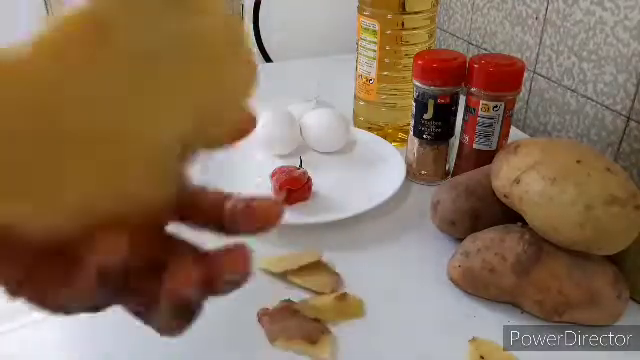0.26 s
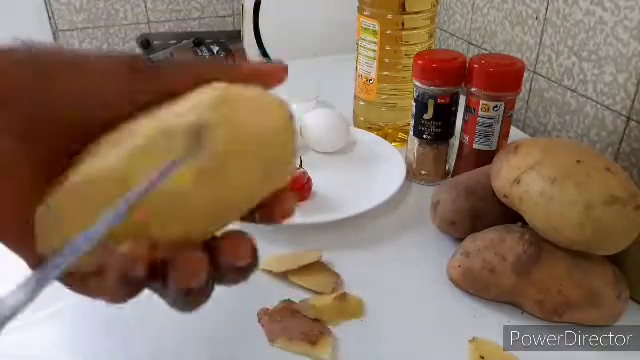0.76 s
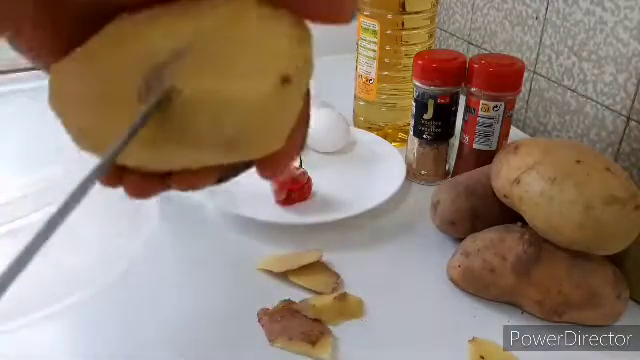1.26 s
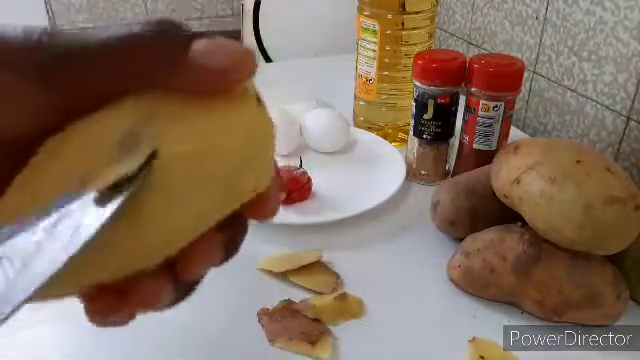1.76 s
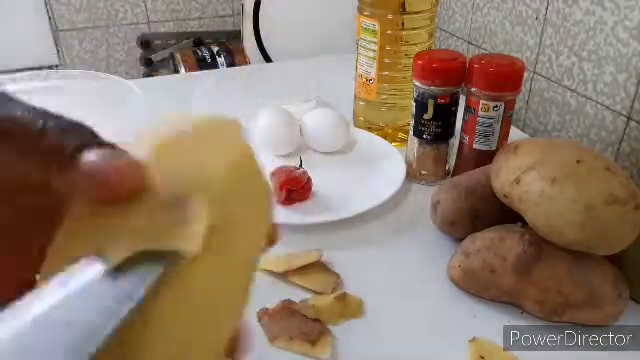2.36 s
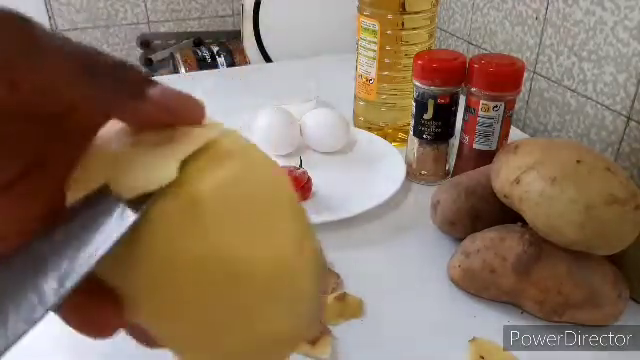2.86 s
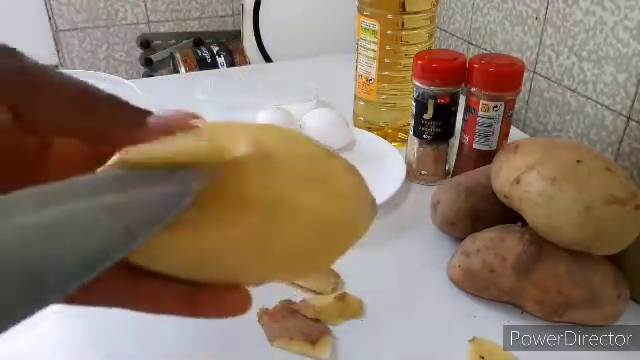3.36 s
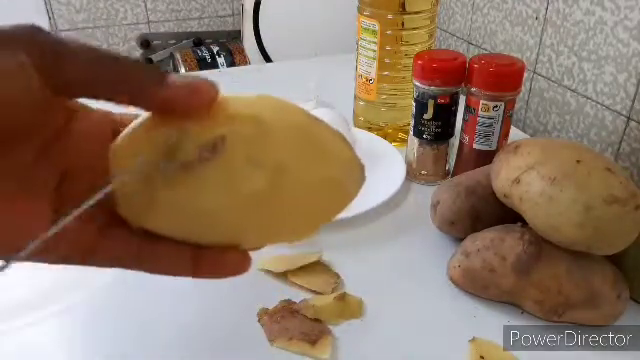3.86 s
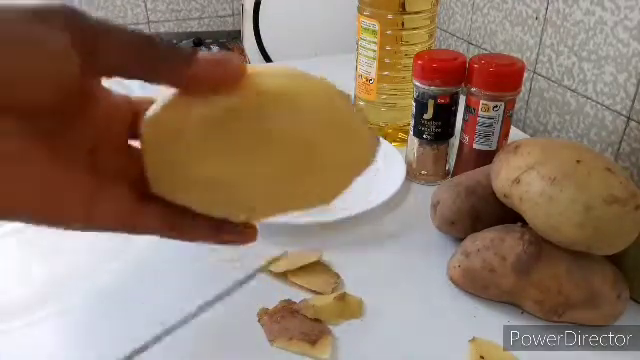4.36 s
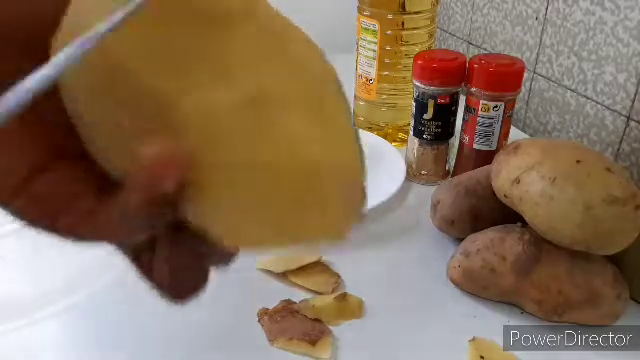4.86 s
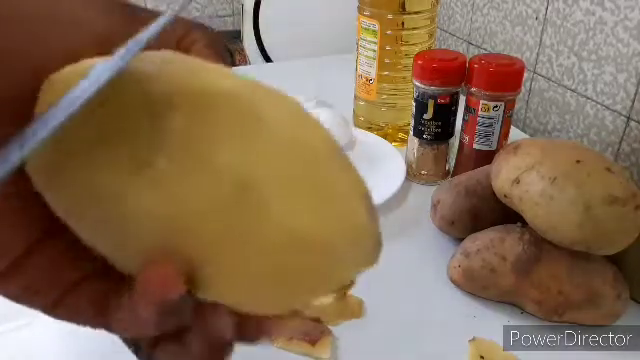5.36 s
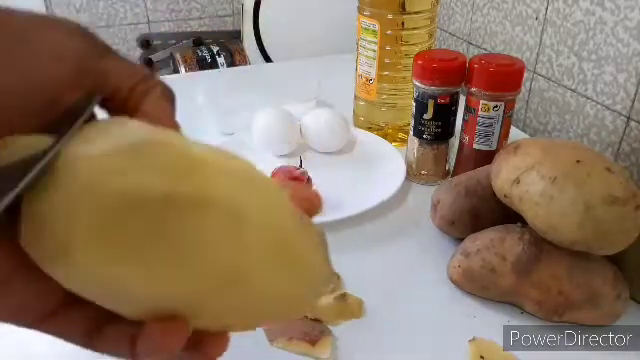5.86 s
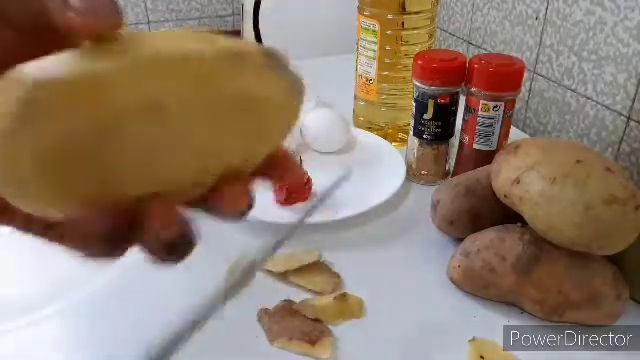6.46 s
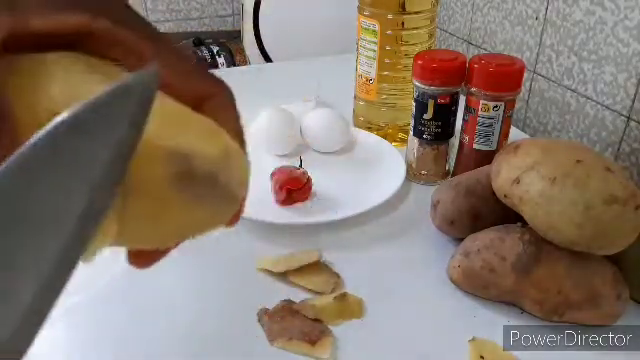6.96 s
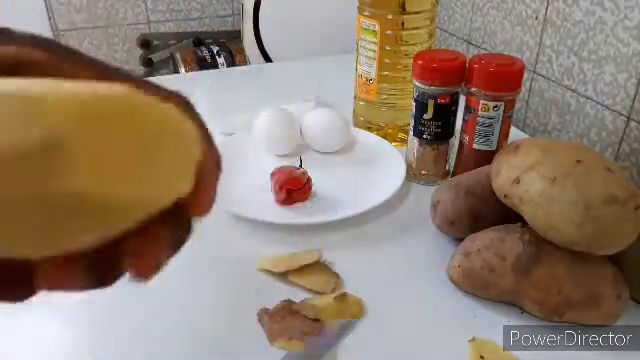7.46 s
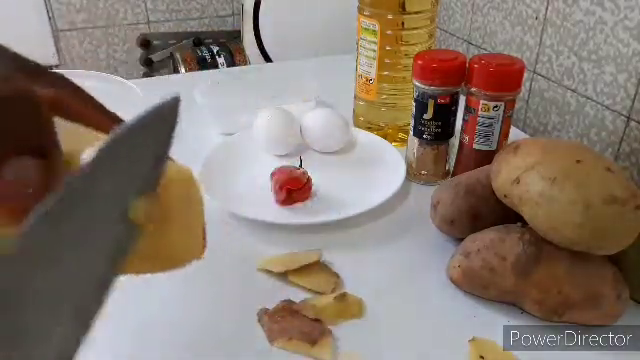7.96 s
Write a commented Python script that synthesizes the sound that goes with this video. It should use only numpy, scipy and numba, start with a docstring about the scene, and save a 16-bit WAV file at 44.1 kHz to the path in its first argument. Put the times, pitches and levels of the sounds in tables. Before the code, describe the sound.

Close, crisp potato peeling: fizzy wet cuts and tiny cracks, dull knocks on a hollow counter, quiet low hum in a small tiled kitchen.

```python
"""A small tiled kitchen: a knife slices through a raw potato held near a stereo phone.
Wet cells tear in a fizz of filtered noise bursts, with sharp snaps and brief squeaks of shaped noise.
Cut pieces drop on a hollow counter top that booms as a bank of decaying modes, and shiver on in a dull clatter.
A fridge hums as a few wavering sine lines, over resonant low noise and a smooth room hiss."""
import sys
import numpy as np
from scipy import signal
from scipy.fft import rfft, irfft
from scipy.io import wavfile
from scipy.ndimage import uniform_filter1d
from numba import njit

SR = 44100
rng = np.random.default_rng(int(sys.argv[2]) if len(sys.argv) > 2 else 0)


def wrap_up_sound(samples):
    """Save the sound to the file named by the first command line argument, as 16-bit audio."""
    columns = np.atleast_2d(samples).T
    # keep every value between -1 and 1, then stretch to whole-number steps
    tamed = np.clip(columns, -1, 1)
    steps = np.round(tamed * 32767).astype(np.int16)
    wavfile.write(sys.argv[1], SR, steps)


N = 362943

# resonances, each: f/Hz, width/Hz, relative level/dB
# bright fizz of tearing cells
FIZZ_BANDS = [(12900, 4900, -4)]
# sizzle below the fizz: f/Hz, width/Hz, relative level/dB
SIZZLE_BANDS = [(8820, 3800, -4)]
# crunch of the flesh: f/Hz, width/Hz, relative level/dB
CRUNCH_BANDS = [(3937, 1260, 6), (6160, 2040, -0.5)]
# broad ring of the blade: f/Hz, width/Hz, relative level/dB
BLADE_BANDS = [(2520, 990, 0)]
# dull drag of the hand: f/Hz, width/Hz, relative level/dB
DRAG_BANDS = [(660, 1225, 10.5), (1364, 900, -5)]
# drops on the counter: t/s, relative level/dB, hardness/dB, left minus right/dB; by landing place: lowest mode/dB,
# long ring near 210 Hz/dB, rings near 300 Hz/dB; clatter after it/dB
DROP_EVENTS = [(.0600, -27, -4, 3, 0.5, -13, -2, -53.5), (0.104, -34.5, 12, 5, 11, -3, -2, -48),
               (0.118, -20.5, 0, 1.5, -1.5, -15, -3.5, -58), (.195, -37.5, 2, -1, 2, -8, -2, -64),
               (4.279, -25.5, -1.5, 3.5, -1, -5.5, -3.5, -56.5), (4.312, -40, 4, 4, 0, 13, -2, -59.5),
               (4.353, -49, -4, 0, 0, -6, 9, -70), (4.377, -44.5, 5, 4, 1, 5, -4, -88),
               (7.412, -20.5, -0.5, 2.5, -1.5, 4.5, -2, -41), (7.423, -38, 9, -2, -9, -14, 4, -51),
               (7.4448, -36, 2, 3, 5, -1, -2, -68), (7.522, -40, 10.5, 3, -1, -3, 2, -59.5),
               (7.584, -30, 2, 4, 3.5, 0, -4, -63.5), (7.6486, -16, 0.5, 2, -4.5, -8.5, -4, -68),
               (7.685, -42, -3, 0, -8, 0, -3, -62), (7.747, -41, -2, 2, 6.5, 5.5, -4, -67)]
HAND_LAG = 18  # samples by which the right port hears the hands late


def undb(db):
    """Amplitude factor of a level in dB."""
    return 10 ** (np.asarray(db) / 20)


def unit(x):
    """Scale to rms 1."""
    return x / np.sqrt(np.mean(x ** 2))


def curves(table):
    """Columns of a table joined by straight lines, one value a sample."""
    s, *columns = np.transpose(table)
    return [np.interp(np.arange(N) / SR, s, c) for c in columns]


def noise():
    """White noise of rms near 1."""
    return rng.standard_normal(N)


def resonate(x, peaks):
    """Sum of steep resonances with alternating sign; rms near 1 for white input of rms 1."""
    out = 0
    for k, (hz, width, db) in enumerate(peaks):
        edges = [hz - width / 2, min(hz + width / 2, SR / 2.2)]
        sos = signal.butter(2, edges, "band", fs=SR, output="sos")
        out = out + (-1) ** k * undb(db) * signal.sosfilt(sos, x)
    power = sum(undb(2 * db) * 2 * width / SR for _, width, db in peaks)
    return out / np.sqrt(power)


def walk(rate):
    """Random levels held 1 / rate s and slewed twice; spread near 1."""
    k = max(int(SR / rate), 1)
    steps = np.repeat(rng.standard_normal(N // k + 1), k)
    return unit(uniform_filter1d(uniform_filter1d(steps, k), k)[:N])


def ports(envelope, alike, lag_count):
    """Shaped noise at two microphone ports: partly alike, the right one late by lag_count samples."""
    left = noise()
    alike = np.clip(alike, 0, 1)
    right = alike * np.roll(left, lag_count) + np.sqrt(1 - alike ** 2) * noise()
    return np.array([envelope * left, np.roll(envelope, lag_count) * right])


def pan(db):
    """Left and right gains that differ by db."""
    return undb(np.array([db, -db]) / 2)


def background():
    """Drifting levels of the upper, middle and low standing waves and of the hum."""
    # kitchen background: t/s, upper standing waves/dB, middle one/dB, low ones/dB, hum/dB
    background_levels = [(0.4, -57, -56, -63.5, -61.5), (0.63, -63.5, -62, -64, -63.5),
                         (0.81, -56, -72, -60, -64), (1.07, -61, -68.5, -66, -63.5),
                         (1.23, -92, -96, -68, -64.5), (1.6, -94, -75, -64, -65.5),
                         (1.85, -67, -70.5, -65.5, -63), (2.6, -68, -73, -65.5, -66.5),
                         (3.05, -67, -66, -64.5, -61), (3.26, -65.5, -68.5, -71, -60),
                         (3.45, -74, -71, -69, -69), (3.7, -59.5, -66.5, -62.5, -61.5),
                         (4.0, -69, -72, -71.5, -66.5), (4.46, -55.5, -68.5, -61.5, -62),
                         (4.9, -95.5, -74, -89.5, -70.5), (5.33, -72.5, -71, -72, -65),
                         (5.65, -66, -67.5, -66.5, -66), (6.27, -60.5, -76.5, -72, -63),
                         (6.42, -72, -83, -79, -70), (6.65, -68.5, -71.5, -82, -68.5),
                         (7.2, -63, -71, -64, -63), (7.9, -71, -64, -61.5, -63.5),
                         (8.14, -57.5, -66, -72, -62.5)]
    return curves(background_levels)


def fridge():
    """Compressor lines waver slightly in phase and level, the right port lagging; a thin noise whine joins."""
    # hum lines: f/Hz, relative level/dB
    hum_lines = [(99.5, -6), (148, 1.5), (199, -15), (345, -19.5), (395.5, -12), (444, -17), (501, -32.5),
                 (643, -15), (692, -37.5)]
    # faint steady whine: f/Hz, width/Hz, relative level/dB
    whine_bands = [(4170, 160, 0), (6780, 200, -3)]
    whine_db = -88
    t, hum = np.arange(N) / SR, 0
    for hz, db in hum_lines:
        phase = 2 * np.pi * (hz * t + rng.random()) + 0.8 * walk(8)
        lag = hz / 250 * np.array([[0], [1]])  # radians, left and right
        hum = hum + np.sqrt(2) * undb(db + 1.48 * walk(6.5)) * np.sin(phase - lag)
    whine = resonate(rng.standard_normal((2, N)), whine_bands)
    whine = undb(whine_db + 2 * walk(6)) * pan(6.0)[:, None] * whine
    hum_db = background()[3]
    return undb(hum_db) * hum * pan(6.0)[:, None] + whine


def rumble():
    """Low noise from far off excites the standing waves of the kitchen."""
    # upper standing waves: f/Hz, width/Hz, relative level/dB
    upper_waves = [(293.2, 13, -4.5), (316.9, 11.2, -3)]
    # middle standing wave: f/Hz, width/Hz, relative level/dB
    middle_wave = [(259, 10.4, 0)]
    # low standing waves: f/Hz, width/Hz, relative level/dB
    low_waves = [(68, 120, 0.5), (105.5, 17, -0.5), (121.6, 12, 4), (212, 57, -4.5)]
    push = ports(np.ones(N), alike=0.92, lag_count=0)
    waves = zip(background(), (upper_waves, middle_wave, low_waves))
    return pan(1.38)[:, None] * sum(undb(db) * resonate(push, peaks) for db, peaks in waves)


def air():
    """The still room: a smooth hiss, more alike at the ports in the bass than higher up."""
    # spectrum of the hiss: f/Hz, relative level per Hz/dB
    air_spectrum = [(20, -19.5), (45, 0.5), (100, -9), (160, -14), (300, 0.5), (460, -10.5), (640, -13),
                    (1000, -35), (1400, -19), (2400, -30), (3300, -37.5), (5900, -42), (9000, -33.5),
                    (15500, -30.5)]
    air_db = -68.5
    hz = np.maximum(np.arange(N // 2 + 1) * SR / N, 1)
    curve_hz, curve_db = np.transpose(air_spectrum)
    gain = undb(np.interp(np.log(hz), np.log(curve_hz), curve_db))
    side = np.clip(hz / 600, .4, 1) * np.array([[1], [-1]])  # part of opposite sign at the two ports
    hiss = irfft(gain * (rfft(noise()) + side * rfft(noise())), N)
    return undb(air_db + 3.6 * walk(5.1)) * pan(0.22)[:, None] * unit(hiss)


def pressure():
    """Each push swells, holds, dies and settles; gives the gains of five parts at two ports, and the crunch pitch."""
    # pushes of the blade and rubs of the fingers: t/s at full pressure, hold/s, fizz level/dB, rise/ms and fall/ms
    # (both for 20 dB); against the fizz: sizzle/dB, crunch/dB, blade ring/dB, drag/dB;
    # left minus right/dB, crunch f/Hz
    push_events = [(0.0, 0.002, -54.5, 10, 41.7, -10, -3.5, -23, -18, 3.3, 5430),
                   (0.103, 0.024, -65.5, 52, 194.6, -3, 7, 8, 11, 1.4, 3770),
                   (0.331, .19, -70, 28, 150.7, 2, 1.5, -18, -5, 8.7, 5140),
                   (0.693, 0.0077, -75, 60, 545, 4.5, 1, -3.5, -5, 4.3, 5000),
                   (1.302, 0.0022, -53, 75, 50.4, -16, -6, -14, -11.5, 3, 3900),
                   (1.42, 0.22, -66, 23, 198.5, 3.5, 1.5, -11, -19, 6.1, 5000),
                   (1.65, 0.046, -55, 170, 99, -0.5, -3, -13.5, -18, 6, 5050),
                   (1.72, 0.0018, -45, 18, 112, -8, -8.5, -15, -36, 8.8, 5100),
                   (1.793, .002, -43, 47, 112, 2.5, -0.5, -9.5, -24.5, 7.4, 4560),
                   (1.85, 0.035, -56.5, 100, 69.8, -6, 2, -6, -8.5, 2.4, 4300),
                   (1.92, 0.26, -64, 46, 60.2, 0.5, 0.5, -11, -9.5, 6.2, 4660),
                   (2.112, 0.002, -50, 13, 138.3, 2.5, 3, -2.5, -14.5, 2, 4340),
                   (2.665, 0.018, -66, 28, 100, -4, -3, -18, -27, 10, 4070),
                   (2.70, 0.14, -58.5, 52, 100, -5, -4, -25, -12.5, 6.9, 4550),
                   (2.93, 0.0018, -49, 150, 272, -5.5, 2, -6.5, -12.5, 6.3, 4820),
                   (3.08, 0.16, -56.5, 100, 100.8, -7, -16, -29, -12.5, 7, 4520),
                   (3.226, 0.0011, -43.5, 105, 61, 1.5, 4, -10.5, -21, 7.7, 5750),
                   (3.457, 0.0016, -56, 82, 54.9, -9, -2, -6.5, -8, 8.1, 4410),
                   (3.581, .002, -71, 40, 110, -7, 6, -2, 9, 5, 5270),
                   (3.87, 0.13, -75, 240, 100, -4, 2.5, -4, -9, 4, 4690),
                   (4.149, 0.057, -53.5, 13, 99.6, -4.5, 1.5, -5, -10, 4.5, 4010),
                   (4.22, 0.031, -59, 100, 111.5, -3, 4.5, -1, -7, 1.9, 3940),
                   (4.51, .002, -78.5, 200, 810, -1, -2, -7, -10, 5.5, 4540),
                   (4.75, 0.29, -85.5, 340, 200, 5, 8, -10.5, -17, 3.3, 4850),
                   (5.11, 0.012, -69.5, 60, 80, -3.5, -6.5, -13, -24, 7.1, 4800),
                   (5.22, 0.0021, -65, 11, 60, -15, -4.5, -15, -5, 4.9, 3970),
                   (5.577, 0.035, -52.5, 33, 60, -19, -7, -16, -17, 6.2, 4380),
                   (5.694, 0.015, -50.5, 49, 40, -12, 1, -12, -14, 6.8, 4790),
                   (5.727, 0.0012, -40.5, 41, 29.3, -3, 3.5, -6.5, -15.5, 3.8, 4700),
                   (5.891, 0.0017, -38, 26.4, 25.1, 0.5, 2, -18.5, -19, 5.3, 4480),
                   (6.53, .002, -82.5, 100, 200, 1.5, -6, -24, -26.5, 14, 5120),
                   (7.10, .002, -50.5, 36.5, 199.5, -3, 0, -13, -10.5, 8.4, 4200),
                   (7.16, 0.05, -57, 60, 100, -12, 0.5, -3.5, -6.5, 8, 3990),
                   (7.25, 0.018, -42, 43, 60, -2.5, 0, -11.5, -14, 9.5, 4500),
                   (7.295, 0.017, -40, 64, 53.1, -0.5, 2, -16, -15, 7.9, 4780),
                   (7.57, 0.07, -69.5, 60, 201, -1, -2, -5, 1, 3.6, 4990),
                   (7.97, 0.1, -58.5, 21, 80.1, -8, -2.5, -11, -14, 8, 4270),
                   (8.015, .008, -49.5, 23, 50.1, -10, -4, -22, -14, 6.5, 4060),
                   (8.063, 0.018, -40.5, 56, 27.85, -4, -3, -25, -21.5, 4.7, 4290)]
    # the hands never rest: fizz level/dB; against it sizzle/dB, crunch/dB, blade ring/dB, drag/dB;
    # left minus right/dB, crunch f/Hz
    holding = (-86, -6.5, 1.5, -2, 3, 1.5, 4694.5)
    settle_db, settle_ms = -41, 710  # the cut settles softly after each push; time for 20 dB
    t = np.arange(0, N / SR + .01, 1 / 1000)  # 1 ms grid
    s, hold, db, rise, fall, *rest = np.transpose(push_events)[:, :, None]
    before = np.maximum(s - t, 0) * 1000
    after = np.maximum(t - s - hold, 0) * 1000
    dying = undb(-20 * after / fall) + undb(settle_db - 20 * after / settle_ms)
    push = undb(db - 20 * before / rise) * dying
    power = np.vstack([push, undb(holding[0]) + 0 * t]) ** 2
    *parts_db, pan_db, hz = (np.append(c, h) for c, h in zip(rest, holding[1:]))

    def fine(v):
        """From the 1 ms grid to one value a sample."""
        return np.interp(np.arange(N) / SR, t, v)

    gains = []
    for part_db in [0 * hz] + parts_db:  # the fizz is the reference
        gains.append([fine(np.sqrt((undb(part_db) * p) ** 2 @ power)) for p in pan(pan_db)])
    crunch_hz = hz @ power / power.sum(axis=0)  # the strongest push dominates
    return np.array(gains), fine(crunch_hz)


def tearing(per_s=2500.0, spread_db=0.5, burst_ms=0.624, bed=1.1):
    """Cells burst at random moments, some louder than the rest, over a wet hiss; the blade sticks and slips."""
    loudness = undb(spread_db * np.minimum(rng.exponential(size=N), 4))
    bursts = (rng.random(N) < per_s / SR) * loudness
    bursts = signal.lfilter([1], [1, -np.exp(-1000 / (burst_ms * SR))], bursts)
    return unit((bed + unit(bursts)) * undb(0.95 * walk(50)))


@njit
def sweep(x, hz, width):
    """State-variable band-pass with a moving centre, gain 1 there."""
    y, band, low = np.empty(len(x)), 0., 0.
    for i in range(len(x)):
        g, k = np.tan(np.pi * hz[i] / SR), width / hz[i]
        v = (band + g * (x[i] - low)) / (1 + g * (g + k))
        band, low, y[i] = 2 * v - band, low + 2 * g * v, k * v
    return y


def slicing():
    """Grainy noise of torn cells rings the tuber, the blade and the hand that drags it, driven by the pushes."""
    # narrow rings of the blade: f/Hz, width/Hz, relative level/dB
    steel_rings = [(2273, 220, -13.5), (4080, 72, 6), (4826, 130, 1.5), (6380, 350, -2.5), (8640, 540, -5),
                   (12500, 600, 5)]
    steel_db = -12
    gains, crunch_hz = pressure()
    grain = tearing()
    tear, slit = (ports(grain, alike=0.059, lag_count=HAND_LAG) for _ in range(2))
    # the opening slit adds a resonance whose pitch moves with the pushes
    opening = unit(np.array([sweep(v, crunch_hz, 600.0) for v in slit]))
    crunch = undb(-4.0) * resonate(tear, CRUNCH_BANDS) + undb(-7.0) * opening
    crunch = crunch + undb(steel_db) * resonate(slit, steel_rings)
    fizz, sizzle = resonate(tear, FIZZ_BANDS), resonate(slit, SIZZLE_BANDS)
    blade, drag = resonate(slit, BLADE_BANDS), resonate(tear, DRAG_BANDS)
    parts = fizz, sizzle, crunch, blade, drag
    return sum(gain * undb(2.07 * walk(35)) * part for gain, part in zip(gains, parts))


def squeaks():
    """Wet skin or blade rubs briefly: flat-topped noise excites a narrow ring and a broad hiss together."""
    # squeaks: t/s, length/ms, f/Hz, width/Hz, ring level/dB, hiss level/dB, left minus right/dB
    squeak_events = [(0.015, 19, 2380, 300, -62.5, -68, 16), (1.259, 51, 3890, 490, -60, -65.5, 16.5),
                     (3.442, 31, 2450, 250, -60.5, -98, 15.5), (4.149, 15, 2360, 300, -48, -45, 4),
                     (4.184, 11.2, 4060, 497, -41.5, -38, 6), (5.692, 12, 13400, 2500, -44, -50.5, 7),
                     (5.888, 11, 4440, 700, -41, -58.5, 4.5), (7.317, 11, 4670, 500, -36, -35, 1.5),
                     (7.524, 12, 1430, 660, -44, -80, 3), (7.534, 24, 1850, 1190, -64, -87, 4)]
    out, size = np.zeros((2, N)), SR // 10
    t = np.arange(size) * 1000 / SR  # ms
    rubs = rng.standard_normal((len(squeak_events), 2, size))
    for (s, ms, hz, width, ring_db, hiss_db, pan_db), rub in zip(squeak_events, rubs):
        rub = rub * np.clip(t / 1.3, 0, 1) * np.clip((ms - t) / 4.3, 0, 1)
        ring = undb(ring_db) * resonate(rub, [(hz, width, 0)])
        hiss = undb(hiss_db) * resonate(rub, FIZZ_BANDS + SIZZLE_BANDS)
        start = int(s * SR)
        out[:, start:start + size] += pan(pan_db)[:, None] * (ring + hiss)
    return out


def drops():
    """Each piece pushes the counter briefly and rings its modes; harder landings reach the high ones."""
    # modes of the hollow counter: f/Hz, relative level/dB, t60/s
    counter_modes = [(122.5, 7, 0.29), (208.3, 4.5, 0.3), (212, 11, 0.04), (266, -3.5, 0.3),
                     (309, -4.5, 0.33), (370.4, 1.5, 0.15), (445, 3, 0.026), (406, -12.5, 0.36),
                     (460.5, -9.5, 0.13), (521, -1, 0.059), (564, -5, 0.062), (660, -32, 0.5),
                     (720, -20, 0.16), (791, -26, 0.09), (950, -14, 0.015), (1186, -21.5, 0.03),
                     (1390, -20, 0.022), (1432, -8, 0.025), (1810, -22, 0.043), (2300, -35, 0.033)]
    # how the modes reach the ports: f/Hz, left minus right/dB, left leads by/rad
    counter_ports = [(122, 0, -0.5), (210, 0.5, -0.26), (310, -6, 0.1), (370, 1, 0.8), (540, -1, -0.1),
                     (1400, 1.5, 0.3)]
    # loose things on the counter: f/Hz, width/Hz, relative level/dB
    rattle_bands = [(650, 300, 21), (1060, 1400, -18), (1840, 410, -23)]
    boom_build_ms = 5.6  # the hollow under the top is slow to start
    size = 3 * SR // 4
    out, t = np.zeros((2, N + SR)), np.arange(size) / SR
    hz, mode_db, t60 = np.transpose(counter_modes)
    port_hz, *columns = np.transpose(counter_ports)
    lean_db, lead = (np.interp(np.log(hz), np.log(port_hz), c) for c in columns)
    build_s = np.append(boom_build_ms / 1000, 0.46 / hz[1:])  # the others build up within a cycle
    shape = np.exp(-np.log(1000) * t / t60[:, None]) * (1 - np.exp(-t / build_s[:, None]))
    turn = 2 * np.pi * hz[:, None] * t + np.array([lead, -lead])[:, :, None] / 2
    # the top dips under the blow while the hollow below puffs out: low and high modes start with opposite sign
    rings = (np.sign(300 - hz) * pan(lean_db))[:, :, None] * shape * np.sin(turn)
    upper = np.clip(np.log2(hz / 300), 0, 2)  # octaves above 300 Hz
    shakes = rng.standard_normal((len(DROP_EVENTS), 2, size))
    for (s, db, hard_db, pan_db, low_db, long_db, mid_db, _), shake in zip(DROP_EVENTS, shakes):
        place_db = np.append([low_db, long_db, 0, mid_db, mid_db], np.zeros(len(hz) - 5))
        ring = undb(mode_db + upper * hard_db + place_db) @ rings
        rattle = undb(hard_db - 14) * resonate(shake * np.exp(-t / 0.014), rattle_bands)
        start = int(s * SR)
        out[:, start:start + size] += undb(db - 12.5) * pan(pan_db)[:, None] * (ring + rattle)
    return out[:, :N]


def clatter():
    """After each drop the wet piece and its neighbours shiver on: dull noise with a little hiss."""
    hiss_db, decay_s = -15.5, 0.041  # hiss against the dull part; time constant
    s, *_, db = np.transpose(DROP_EVENTS)
    hits = np.zeros(N)
    hits[(s * SR).astype(int)] = undb(db)
    shiver = signal.lfilter([1], [1, -np.exp(-1 / (decay_s * SR))], hits)
    shiver = shiver * undb(3.9 * walk(60))
    shake = ports(shiver, alike=0.15, lag_count=HAND_LAG)
    dull = ports(shiver, alike=0.56, lag_count=HAND_LAG // 3)
    hiss = resonate(shake, BLADE_BANDS) + resonate(shake, CRUNCH_BANDS)
    hiss = hiss + undb(2.0) * resonate(shake, SIZZLE_BANDS + FIZZ_BANDS)
    return pan(3.9)[:, None] * (resonate(dull, DRAG_BANDS) + undb(hiss_db) * hiss)


def snaps():
    """Single cracks of the flesh: a short creak, a click with a ragged body, then the split tears on softly."""
    # flesh snaps: t/s, relative level/dB, left minus right/dB, crunch/dB, blade ring/dB, f/Hz,
    # body decay/ms (never under 0.2), tearing on after it/dB
    snap_events = [(0.1021, -56, 0, -20, 21, 12000, 1.4, -12), (1.4134, -40, 12, -7, -32, 13000, 0.67, -30),
                   (1.4414, -40.5, 8.5, -6.5, -19, 12300, 0.88, -2),
                   (1.6499, -25.5, 15, -14.5, -27.5, 9500, 1.4, -24),
                   (1.7173, -43.5, 18, -20, -25.5, 13400, 1.2, -22.5),
                   (1.725, -35, 17, -8.5, -20.5, 9500, 1.2, -23.5),
                   (1.7806, -23.5, 11, -14, -29, 12800, 1.3, -21),
                   (1.7825, -20.5, 13.5, -12, -23.5, 9800, 1.2, -11.5),
                   (1.8012, -19, 2, -15, -22.5, 8850, 1.2, -17),
                   (1.8207, -22.5, 5.5, -1.5, -27.5, 12900, 1.5, -14.5),
                   (1.8485, -25, 3.5, -18, -29, 8770, 1.4, -18.5),
                   (1.8715, -17.5, 9, -10.5, -14, 13300, 1.9, -27.5),
                   (1.9357, -52, 3, -25, -28, 12900, 1.2, -19),
                   (2.052, -39.5, 12, -21, -30.5, 11100, 1.3, -9.5),
                   (2.105, -18, 14.5, -11.5, -17.5, 12730, 1.6, -42.5),
                   (2.13, -28, 4, -17.5, -21.5, 12900, 1.1, -30),
                   (2.6577, -46.5, 12, -24, -31, 10300, 0.79, -26), (2.691, -46, 3, -18, -30, 9000, 1, -20),
                   (3.571, -45.5, 18.5, 5, -6, 7600, 1.2, -39), (3.8327, -52.5, 7, -7, -35, 10200, 1.2, 9),
                   (3.9288, -53, 6, 1, -2.5, 12400, 0.42, -2),
                   (4.9322, -57, 17, -22.5, -30, 14600, 1.9, -26),
                   (4.99, -54, 13, -26.5, -28, 13000, 1.2, -17),
                   (5.219, -48, 10.5, -20, -21.5, 12900, 1.3, -17.5),
                   (5.5444, -56, 4, -14, -25, 11500, 1.2, -20),
                   (5.5767, -48, 12.5, -21.5, -28, 12100, 1.2, -21),
                   (5.606, -38, 8, -3, -15.5, 12500, 1.5, -19), (5.696, -41, 2, -13, -20, 13300, 1.2, -19),
                   (5.882, -28, 1.5, -22.5, -29, 11700, 1.1, -21),
                   (5.9004, -23, -1, -1, -9, 7100, 0.93, -18.5), (7.026, -57, 17.5, -4, -22, 8840, 1.44, 3),
                   (7.089, -40.5, 16, -6, -28.5, 11800, 1.3, -8.5),
                   (7.3215, -15, 12, -10, -18.5, 7900, 1.1, -21.5),
                   (7.412, -28, 2.5, 0, -9.5, 7300, 0.99, -18), (7.2503, -34, 10, -13, -18, 9000, 1.3, -16),
                   (7.96, -41, 3, -4, -8, 7200, 1, -17)]
    rise_ms, core_ms, lead_ms = 0.1, 0.35, 0.6  # click rise and decay; the flesh creaks up to the click
    body_db, echo_ms, echo_db = -5.5, 3.1, -12  # ragged body; echo off the counter
    out, size, lead = np.zeros((2, N + SR)), SR // 8, SR // 200
    ms_after = (np.arange(size) - lead) * 1000 / SR
    before, after = np.maximum(-ms_after, 0), np.maximum(ms_after, 0)
    click = np.clip(ms_after / rise_ms, 0, 1) * np.exp(-after / core_ms)
    grains = rng.standard_normal((len(snap_events), 2, size))
    for (s, db, pan_db, crunch_db, blade_db, hz, ms, after_db), grain in zip(snap_events, grains):
        body = undb(body_db) * np.exp(-after / max(ms, .2))
        body = body + np.abs(grain) * undb(after_db) * np.exp(-after / 15)
        burst = np.sign(grain) * (click + body * np.exp(-before / lead_ms))
        bands = FIZZ_BANDS + SIZZLE_BANDS, [(hz, 2500, 0)], CRUNCH_BANDS, BLADE_BANDS
        parts = [resonate(burst, peaks) for peaks in bands]
        levels_db = -3., -1.5, crunch_db, blade_db
        crack = sum(undb(d) * p / np.abs(p).max() for d, p in zip(levels_db, parts))
        crack = crack + undb(echo_db) * np.roll(crack, int(echo_ms * SR / 1000), axis=1)
        start = int(s * SR) - lead
        out[:, start:start + size] += undb(db) * pan(pan_db)[:, None] * crack
    return out[:, :N]


def shade(x):
    """Dips that the body of the phone cuts into sound from close by."""
    # shaded bands: f/Hz, width/Hz, depth/dB
    port_dips = [(1760, 360, -2.5), (3270, 650, -2.5), (10440, 920, -2)]
    hz = np.arange(N // 2 + 1) * SR / N
    dip_db = sum(db * np.exp(-2 * ((hz - f) / w) ** 2) for f, w, db in port_dips)
    return irfft(rfft(x) * undb(dip_db), N)


def room(x):
    """Tiled walls return a short decaying wash, different at each port."""
    t60_s, wash_db, low_hz = 0.34, -7.5, 296
    t = np.arange(SR // 2) / SR
    tail = rng.standard_normal((2, len(t))) * np.exp(-np.log(1000) * t / t60_s) * (t > .002)
    tail = tail / np.sqrt(np.sum(tail ** 2, axis=1, keepdims=True))
    tail = signal.sosfilt(signal.butter(2, low_hz, "high", fs=SR, output="sos"), tail)
    mono = x.mean(axis=0, keepdims=True)
    return undb(wash_db) * signal.fftconvolve(mono, tail, axes=1)[:, :N]


def scene():
    """Cutting, clatter and thuds with their wash, over the fridge, the rumble and the air."""
    near = shade(slicing() + snaps() + squeaks()) + clatter()
    thuds = drops()
    wash = room(near + undb(3.0) * thuds)
    return near + thuds + wash + fridge() + rumble() + air()


def record(dry):
    """The phone loses the deepest bass and cuts the top steeply."""
    low_hz, top_hz = 61.4, 15600
    dry = signal.sosfilt(signal.butter(2, low_hz, "high", fs=SR, output="sos"), dry)
    return signal.sosfilt(signal.ellip(10, .2, 70, top_hz, fs=SR, output="sos"), dry)


dry = scene()
out = record(dry)
wrap_up_sound(out)
```